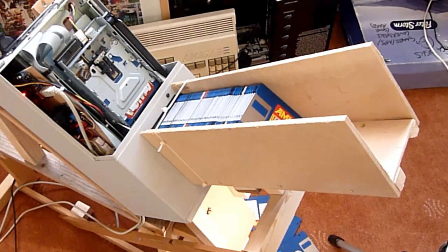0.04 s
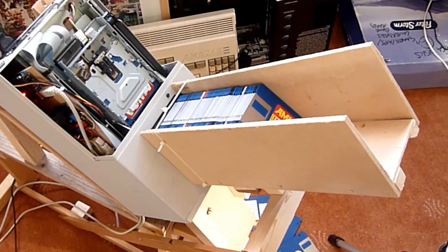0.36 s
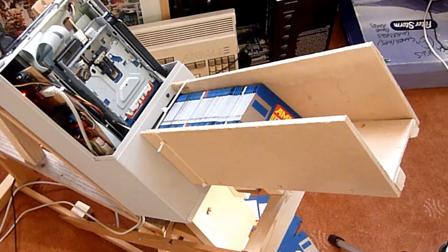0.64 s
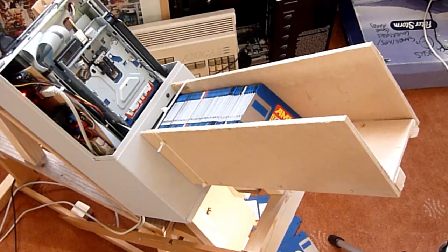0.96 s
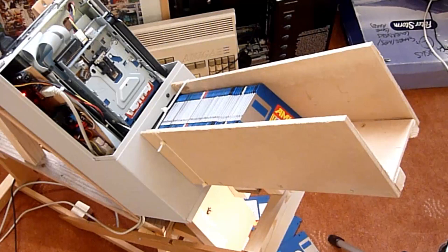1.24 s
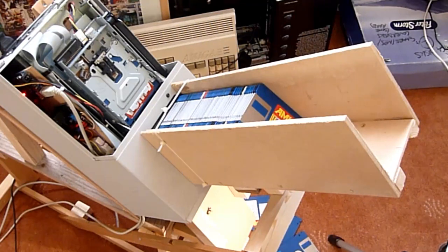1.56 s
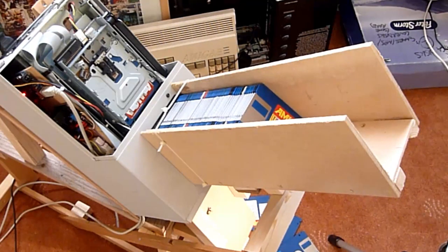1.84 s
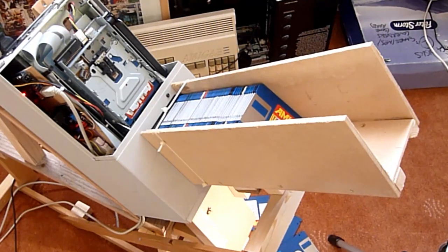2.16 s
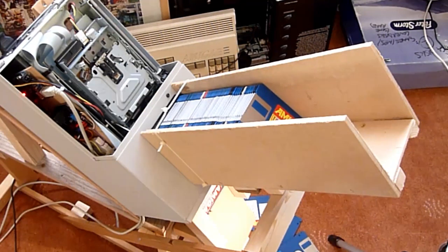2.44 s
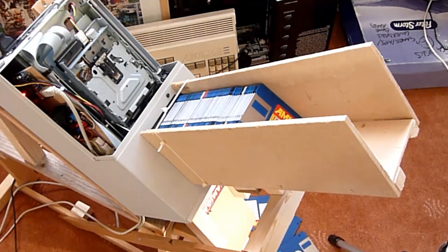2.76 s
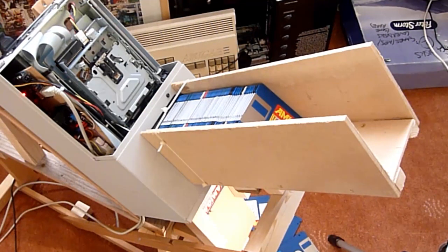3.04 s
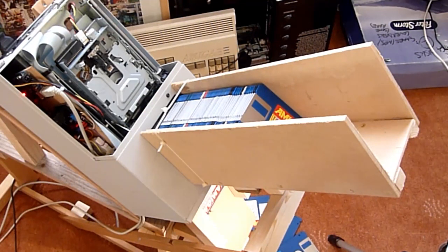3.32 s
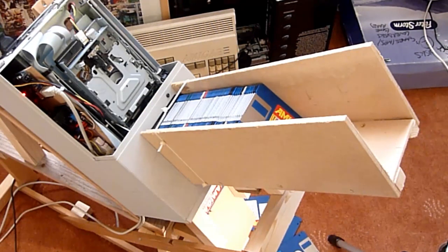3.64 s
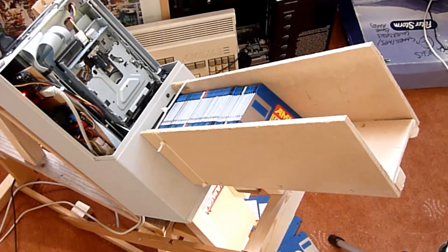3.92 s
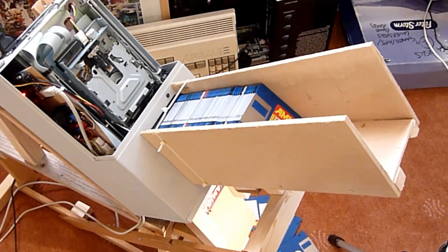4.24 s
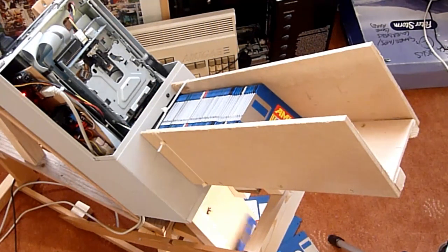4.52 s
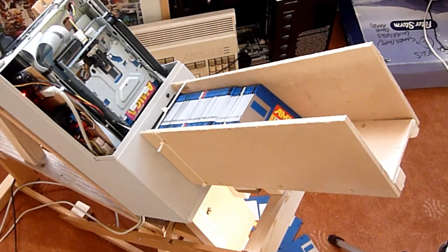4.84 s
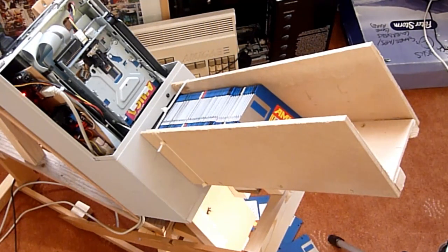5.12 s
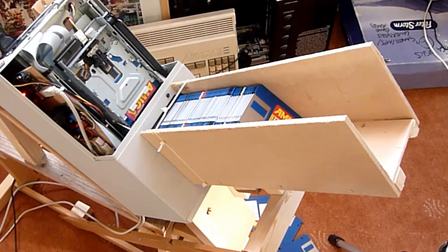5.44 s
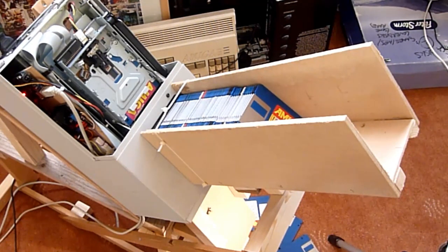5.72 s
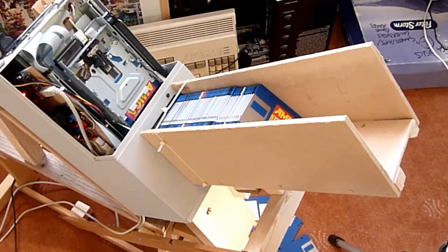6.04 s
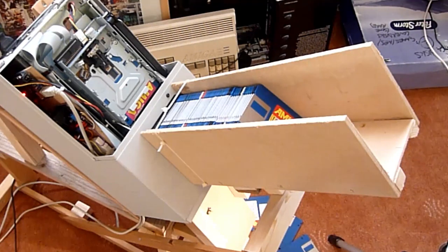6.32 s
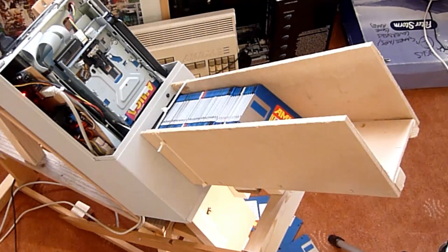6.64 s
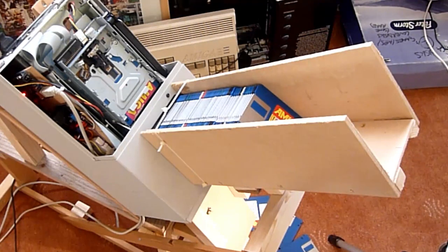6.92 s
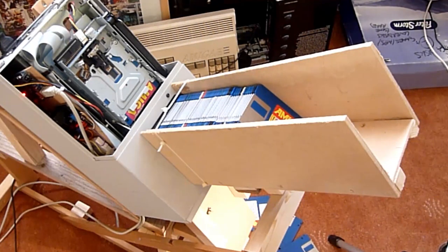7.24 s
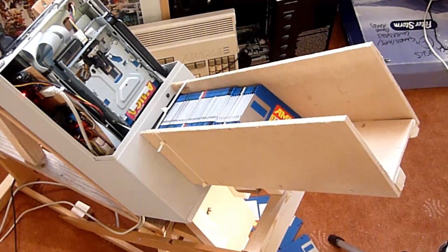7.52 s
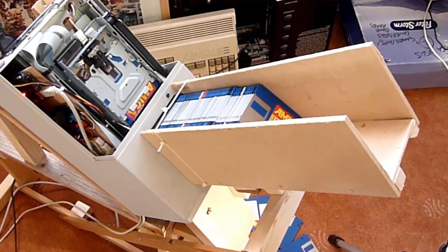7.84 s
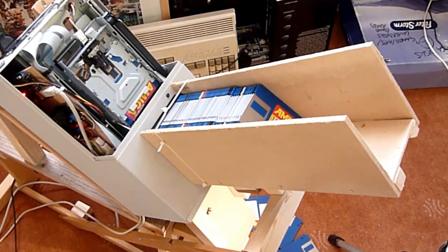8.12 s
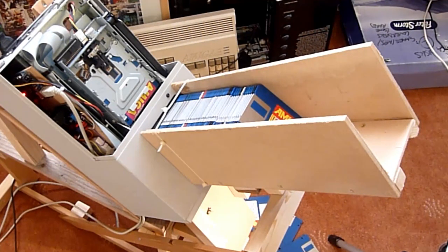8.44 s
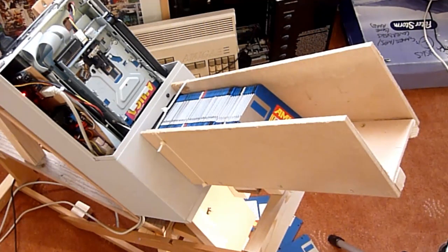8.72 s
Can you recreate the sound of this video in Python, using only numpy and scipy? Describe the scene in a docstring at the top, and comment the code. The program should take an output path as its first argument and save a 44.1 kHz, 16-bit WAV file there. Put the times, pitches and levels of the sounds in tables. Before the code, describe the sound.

Steady motor whine and ticking from a floppy disk loader, interrupted by sharp clacks as one disk ejects and another loads.

```python
"""A home-made floppy disk autoloader, heard from close above in a small, dry room.
A geared motor whirrs and a small fan hums throughout. At first the drive holds a disk and ticks.
At 2.3 seconds the motor sags under load and the eject mechanism clacks the disk out.
A joint squeaks faintly, and at about 4.5 seconds the next disk rattles in.
Then the motor runs free again and the ticking returns."""
import sys
import numpy as np
from scipy import signal
from scipy.fft import rfft, irfft
from scipy.io import wavfile

SR = 44100
rng = np.random.default_rng(int(sys.argv[2]) if len(sys.argv) > 2 else 0)


def wrap_up_sound(samples):
    """Save the sound to the file named by the first command line argument, as 16-bit audio."""
    columns = np.atleast_2d(samples).T
    # keep every value between -1 and 1, then stretch to whole-number steps
    tamed = np.clip(columns, -1, 1)
    steps = np.round(tamed * 32767).astype(np.int16)
    wavfile.write(sys.argv[1], SR, steps)


N = 386757

# The hum of the fan blades. Each row: pitch in Hz, level in dB.
FAN_TONES = [(480.5, -72.5), (327, -85)]
# The broad tone colour of gear and air noise. Each row: frequency in Hz, gain in dB.
WHIRR_SHAPE = [(25, -25), (80, -28), (200, -17.5), (330, -11.5), (550, -6.5), (1000, -2.5), (1500, -1),
               (1900, 3), (3000, -1.5), (4500, -5.5), (7300, -5.5), (8600, -8), (12000, -8.5), (15600, -11)]
# Resonances of the housing, the places where it rings. Each row: frequency in Hz, width in Hz, boost in dB.
HOUSING_MODES = [(1080, 28, 3.7), (1904, 109, 6.1), (2074, 140, 3.6), (2249, 122, 9.8), (2462, 140, 6.3),
                 (2667, 93, 8.9), (2822, 156, 11.2), (3210, 45, 5.9), (3350, 100, 7), (3725, 170, 8),
                 (3880, 167, 12.4), (4180, 95, 7.8), (4700, 120, 1.3), (5020, 110, 4.4), (5650, 140, 5.6),
                 (5950, 90, 4.1), (6570, 130, 2.7)]
# How alike left and right are, for the whirr and for blows.
# Each row: frequency in Hz, likeness (1 is the same, 0 is unrelated, below 0 is opposed).
WHIRR_LIKENESS = [(60, 0.16), (120, 0.13), (240, 0.13), (480, 0.35), (950, 0.44), (1890, 0.96),
                  (3770, 0.72), (7520, -0.078), (15000, -0.34)]
BLOW_LIKENESS = [(60, .3), (240, 0.94), (950, 1), (3800, 1), (15000, 0.85)]
# How far the whirr leans to the left. Each row: frequency in Hz, left minus right in dB.
WHIRR_LEAN = [(60, 0), (150, 4), (380, 4), (950, 2), (2380, 0.0), (5980, 0.0), (15000, 0.0)]
# The motor's whine. Each row: multiple of the shaft's speed, base level in dB when idle and when loaded.
WHINE_TONES = [(7, -53.5, -57.5), (14, -63.5, -74), (16, -66.5, -81), (20, -73, -78), (21, -78, -73),
               (24, -65.5, -63), (25, -78, -69), (28, -64.5, -63.5), (32, -73, -76), (36, -80, -76),
               (40, -84, -70.5), (44, -69, -66.5), (52, -88, -98), (56, -81, -88), (60, -81, -85.5),
               (62, -92, -81), (64, -80, -83)]

# The broad tone colours of the wooden frame, the plastic, the steel chassis and the hard edges,
# then of a tick's click and its tail. Each row: frequency in Hz, gain in dB.
WOOD_SHAPE = [(30, -19), (130, -13), (310, 6), (390, 5), (480, -22), (1500, -45)]
PLASTIC_SHAPE = [(60, -58), (300, -32), (600, -15.5), (820, -6), (1500, -3), (2200, 0), (2600, -11),
                 (6000, -52)]
STEEL_SHAPE = [(100, -66), (1000, -40), (2200, -7.5), (2600, -2.5), (4800, 0.5), (5500, -5.5), (8000, -29)]
EDGE_SHAPE = [(100, -75), (2500, -36), (5300, -3.5), (7500, -0.5), (10000, 0), (14000, -0.5), (15400, 2)]
TICK_CLICK_SHAPE = [(100, -70), (3000, -31), (5500, 5.5), (8500, -6), (11000, 4), (13500, -7), (15200, 2.5)]
TICK_TAIL_SHAPE = [(100, -70), (3000, -23), (3650, -8), (4050, -8), (4550, -1), (5200, -10), (8000, -28)]
# Resonances of the plastic, the steel and the edges. Each row: frequency in Hz, width in Hz, boost in dB.
PLASTIC_MODES = [(850, 150, 2.6), (1430, 160, 3), (1705, 140, 5.7), (2020, 190, 3)]
STEEL_MODES = [(2685, 210, 7.4), (3520, 170, 4), (3740, 320, 5.7), (4260, 130, 4), (4580, 230, 6.6)]
EDGE_MODES = [(5820, 120, 5), (6840, 160, 6), (7320, 150, 5.1), (7840, 160, 4), (8350, 200, 7.6),
              (9400, 120, 6.1), (11350, 200, 4), (13600, 600, 3)]

# The two chassis pings in a tick. Each row: pitch in Hz, relative level in dB, time to swell in seconds.
PING_TONES = [(3695, -1.5, 0.0025), (4580, -6.5, 0.0021)]
# Runs of evenly spaced ticks. Each row: first and last tick in seconds, base levels of ping and click
# in dB, delay of the upper ping in seconds.
HEAD_TICK_RUNS = [(0.0994, 0.0994, -41.5, -45, 0.0053), (0.371, 2.0315, -43.3, -44.3, .003),
                  (4.9492, 4.9492, -39, -48, 0), (4.9552, 4.9552, -36.5, -45, 0),
                  (5.4307, 5.4307, -37.5, -47, 0), (5.7018, 7.6514, -36.7, -47.3, 0),
                  (7.961, 8.5172, -36.5, -47.3, 0)]
# The squeak of a dry joint. Each row: pitch in Hz, level in dB.
SQUEAK_TONES = [(5700, -56.5), (11400, -64), (12790, -68)]
# Slider and disk rub their guides. Each row: start and length in seconds, treble and steel levels in dB.
GUIDE_SCRAPES = [(2.321, 0.046, -38.5, -47), (2.391, .013, -29.5, -38), (3.287, 0.085, -57, -60),
                 (4.551, 0.058, -37, -42), (4.606, 0.072, -37, -44.5)]
# Dry snaps of hard edges and the latch. Each row: start in seconds, level in dB.
EDGE_SNAPS = [(2.357, -24), (4.574, -12), (4.5895, -14), (4.6427, -18), (4.81, -21), (5.008, -27)]
# The ring of the lever's end stop. Each row: pitch in Hz, level in dB, seconds to fade by 60 dB.
END_STOP_TONES = [(884, -37, 0.04), (2033, -21.5, 0.03), (4690, -15, 0.019)]
# The parts that strike the drive. Each name gives: the plastic and the steel resonance it favours in Hz,
# boost of the highest treble in dB, seconds for the steel to fade by 60 dB.
STRIKING_PARTS = {"latch": (1650, 3740, -10, 0.07), "lever": (1502, 4650, -1, 0.03),
                  "carriage": (2070, 4700, 3, 0.046), "disk": (850, 3840, 4, 0.047)}
# The blows on the drive. Each row: start in seconds, striking part, strength in dB,
# then plastic knock, edge crack and bounce, each in dB above that strength.
DRIVE_BLOWS = [(2.3, "latch", -22, -20, -3.5, -7.5), (2.315, "latch", -33.5, -9, 0, -10),
               (2.355, "lever", -23, -5.5, 2, -2), (2.389, "lever", -28.5, -13, 4, -4),
               (2.4048, "lever", -18.5, -6, 1.5, -15), (4.538, "disk", -35, -5, 4.5, -1),
               (4.549, "disk", -36, -9, 5, -17), (4.5602, "carriage", -26.5, -6, -1, -1.5),
               (4.5738, "carriage", -25, -6, 3, -7), (4.5895, "disk", -34, -6, 7, 2.5),
               (4.623, "disk", -35, -9, 2, -15), (4.6326, "disk", -25.5, -11.5, -0.5, -3),
               (4.654, "disk", -33, -7.5, 0.5, -4)]
# Heavy blows shake the wooden frame. Each row: start in seconds, strength in dB.
FRAME_THUDS = [(2.3015, -54), (2.3544, -48.5), (2.4064, -61), (4.565, -45.5), (4.594, -56), (4.6325, -56),
               (4.656, -61)]


def amp(db):
    """Turn decibels into a factor to multiply by."""
    return 10 ** (np.asarray(db) / 20)


def unit_level(x):
    """Scale a signal so that its average (rms) level is 1."""
    return x / np.sqrt(np.mean(x ** 2) + 1e-20)


def curve_at(points, hz):
    """Read a smooth curve from a table, between its frequencies."""
    table_hz, values = np.transpose(points)
    return np.interp(np.log(hz + 1), np.log(table_hz + 1), values)


def add(mix, start_s, sound):
    """Mix a sound in at its start time."""
    part = mix[:, round(start_s * SR):][:, :sound.shape[1]]
    part += sound[:, :part.shape[1]]


def colour_db(shape, modes, hz):
    """The gain in dB of a broad tone colour with resonance peaks on top."""
    peaks = sum(db * .5 ** ((2 * (hz - centre) / width) ** 2) for centre, width, db in modes)
    return curve_at(shape, hz) + peaks


def wander(rate_hz):
    """A smooth random wobble of average size 1, up to about the given rate."""
    hz = np.fft.rfftfreq(N, 1 / SR)
    return unit_level(irfft(rfft(rng.standard_normal(N)) * np.exp(-(hz / rate_hz) ** 2), N))


def stereo(spectra, likeness):
    """Blend two unrelated spectra into a left and a right that are partly alike."""
    same = np.clip(likeness, -1, 1)
    mid = spectra[0] * np.sqrt((1 + same) / 2)
    side = spectra[1] * np.sqrt((1 - same) / 2)
    return np.array([mid + side, mid - side])


def blow(db, fade_s, shape, modes=(), rise_s=0.00055, size=8192):
    """A burst of tiny contacts rings a part; it starts near db and drops 60 dB in fade_s."""
    t, hz = np.arange(size) / SR, np.fft.rfftfreq(size, 1 / SR)
    fade = amp(-60 * t / fade_s) * (1 - np.exp(-t / rise_s))
    burst = rng.standard_normal((2, size)) * fade
    for _ in range(2):  # hard contacts drive all frequencies alike
        burst = irfft(np.exp(1j * np.angle(rfft(burst)))) * np.sqrt(fade)
    log_gain = np.log(amp(colour_db(shape, modes, abs(np.fft.fftfreq(size, 1 / SR)))))
    ringing = np.exp(np.conj(signal.hilbert(log_gain)))[:len(hz)]  # rings only after it is struck
    sound = irfft(stereo(rfft(burst), curve_at(BLOW_LIKENESS, hz)) * ringing)
    return amp(db) * unit_level(sound) * np.sqrt(np.mean(fade ** 2))


def room(sound, fade_s=0.085, size=12000):
    """The carpeted room answers with a very short echo."""
    t = np.arange(size) / SR
    tail = rng.standard_normal((2, size)) * amp(-60 * t / fade_s) * (1 - np.exp(-t / 0.0043))
    return signal.fftconvolve(sound, tail / np.linalg.norm(tail[0]), axes=1)[:, :N]


def low_hum(hz=196, db=-90, end_s=2.33):
    """A faint low drone while the first disk is in the drive."""
    t = np.arange(N) / SR
    fade_out = np.clip((end_s - t) / .05, 0, 1)
    return np.sqrt(2) * amp(db) * np.sin(2 * np.pi * hz * t) * fade_out


def fan(pitch_waver=0.00211, flicker_db=1.2, lean_db=1.2):
    """The blades of the cooling fan hum, wavering a little and louder on the left."""
    wavering_t = np.cumsum(1 + pitch_waver * wander(7.4)) / SR
    hum = sum(np.sqrt(2) * amp(db) * np.sin(2 * np.pi * hz * wavering_t) for hz, db in FAN_TONES)
    return hum * amp(flicker_db * wander(11)) * amp([[lean_db], [-lean_db]])


def motor_effort(start_s=2.27, grip_s=0.0898, push_s=0.299, end_s=4.7, relax_s=.17,
                 slack_at_s=3.37, slack_s=.09):
    """The motor's load over time (0 idle, 1 working), and the dB this adds to its upper whine."""
    t = np.arange(N) / SR
    # It waits, grips, works, pushes the next disk home, then runs free.
    load = np.interp(t, [start_s, start_s + grip_s, end_s - push_s, end_s], [.12, 1, 1, 1.15])
    load *= np.exp(-np.maximum(t - end_s, 0) / relax_s)
    slack = np.exp(-((t - slack_at_s) / slack_s) ** 2)  # midway the mechanism goes slack for a moment
    upper_db = 1.2 * load - 9 * slack
    return load - 0.2205 * slack, upper_db


def motor_whirr(idle_db=-44.82, load_db=-0.23, flicker_db=0.33, right_lag_s=.000012):
    """Noise from gears, brushes and air rings through the housing."""
    hz = np.fft.rfftfreq(N, 1 / SR)
    noise = stereo(rfft(rng.standard_normal((2, N))), curve_at(WHIRR_LIKENESS, hz))
    lean_db = np.array([[.5], [-.5]]) * curve_at(WHIRR_LEAN, hz)
    noise *= amp(colour_db(WHIRR_SHAPE, HOUSING_MODES, hz) + lean_db)
    noise[1] *= np.exp(-2j * np.pi * hz * right_lag_s)  # the motor sits a little to the left
    load, _ = motor_effort()
    level_db = idle_db + load_db * load + flicker_db * wander(70)
    return amp(level_db) * unit_level(irfft(noise, N))


def motor_whine(idle_hz=238.6, sag_hz=3.2, flutter_hz=0.087, shimmer_db=0.5, spread=0.62):
    """Tones at multiples of the shaft's speed; load slows the shaft and changes which are loudest."""
    load, upper_db = motor_effort()
    turns = np.cumsum(idle_hz - sag_hz * load + flutter_hz * wander(25.4)) / SR
    shimmer, out = wander(27), np.zeros((2, N))
    for multiple, idle_db, loaded_db in WHINE_TONES:
        db = idle_db + (loaded_db - idle_db) * load + upper_db * (multiple > 20)
        level = amp(db + shimmer_db * np.roll(shimmer, rng.integers(N)))
        lag = np.array([[0], [spread * multiple / 20]])  # radians by which the right side trails
        out += np.sqrt(2) * level * np.sin(2 * np.pi * (multiple * turns + rng.random()) - lag)
    return out


def tick_times(every_s=.278, scatter_db=.5):
    """List every tick of every run, each a little louder or softer by chance."""
    for first_s, last_s, ping_db, click_db, delay_s in HEAD_TICK_RUNS:
        count = 1 + round((last_s - first_s) / every_s)
        for start_s in np.linspace(first_s, last_s, count):
            chance_db = scatter_db * rng.standard_normal()
            yield start_s, ping_db + chance_db, click_db + chance_db, delay_s


def head_ticks(click_boost_db=1.0, tail_db=-12, tail_fade_s=0.1, pitch_scatter=0.0075):
    """The drive's head steps a few times a second: a click, then two chassis pings swell and die."""
    t, out = np.arange(1200) / SR, np.zeros((2, N))
    for start_s, ping_db, click_db, delay_s in tick_times():
        add(out, start_s, blow(click_db + click_boost_db, 0.035, TICK_CLICK_SHAPE, rise_s=.0001))
        add(out, start_s + .002, blow(ping_db + tail_db, tail_fade_s, TICK_TAIL_SHAPE))
        for k, (hz, db, swell_s) in enumerate(PING_TONES):
            swell = (t / swell_s * np.exp(1 - t / swell_s)) ** 4
            pitch_hz = hz * (1 + pitch_scatter * rng.standard_normal())
            ping = swell * np.sin(2 * np.pi * (pitch_hz * t + rng.random()))
            add(out, start_s + k * delay_s, np.sqrt(2) * amp(ping_db + db) * ping[None])
    return out


def squeak(start_s=3.29, length_s=0.081):
    """A few high tones swell and fade as a dry joint slips."""
    t, out = np.arange(int(length_s * SR)) / SR, np.zeros((2, N))
    tone = sum(np.sqrt(2) * amp(db) * np.sin(2 * np.pi * hz * t) for hz, db in SQUEAK_TONES)
    add(out, start_s, tone[None] * signal.windows.tukey(len(t), .6))
    return out


def scrapes():
    """Sliding parts rub the chassis in a stream of tiny contacts."""
    out = np.zeros((2, N))
    for start_s, length_s, treble_db, steel_db in GUIDE_SCRAPES:
        rub = blow(treble_db, 2, EDGE_SHAPE, EDGE_MODES) + blow(steel_db, 1.8, STEEL_SHAPE, STEEL_MODES)
        size = int(length_s * SR)
        add(out, start_s, rub[:, :size] * signal.windows.tukey(size, .25))
    return out


def snaps(sizzle_db=-18):
    """Hard edges click for about a millisecond, and the sheet steel sizzles briefly after."""
    out = np.zeros((2, N))
    for start_s, db in EDGE_SNAPS:
        click = blow(db, 0.0025, EDGE_SHAPE, rise_s=.00005)
        sizzle = blow(db + sizzle_db, 0.042, EDGE_SHAPE, EDGE_MODES)
        add(out, start_s, click + sizzle)
    return out


def end_stop(start_s=2.4066, rise_s=0.00032):
    """The eject lever slams into its end stop and rings the chassis."""
    t, out = np.arange(4000) / SR, np.zeros((2, N))
    ring = sum(amp(db - 60 * t / fade_s) * np.sin(2 * np.pi * (hz * t + rng.random()))
               for hz, db, fade_s in END_STOP_TONES)
    ring *= 1 - np.exp(-t / rise_s)
    add(out, start_s, np.sqrt(2) * ring[None])
    return out


def strike(part, db, knock_db, crack_db, favour_db=7):
    """One hit: plastic knocks, steel rings, an edge cracks; the striking part picks what rings most."""
    plastic_hz, steel_hz, top_db, fade_s = STRIKING_PARTS[part]
    plastic_modes = PLASTIC_MODES + [(plastic_hz, 260, favour_db)]
    steel_modes = STEEL_MODES + [(steel_hz, 320, favour_db)]
    edge_modes = EDGE_MODES + [(13800, 6200, top_db)]
    knock = blow(db + knock_db, fade_s * 1.34, PLASTIC_SHAPE, plastic_modes)
    ring = blow(db, fade_s, STEEL_SHAPE, steel_modes)
    crack = blow(db + crack_db, fade_s * 1.66, EDGE_SHAPE, edge_modes, rise_s=0.00018)
    return knock + ring + crack


def clacks(gain_db=0.47, bounce_s=.007, bounce_knock_db=-7):
    """Moving parts and disk strike the drive and bounce once; heavy blows thump the wooden frame."""
    out = np.zeros((2, N))
    for start_s, part, db, knock_db, crack_db, bounce_db in DRIVE_BLOWS:
        add(out, start_s, strike(part, db, knock_db, crack_db))
        add(out, start_s + bounce_s, strike(part, db + bounce_db, knock_db + bounce_knock_db, crack_db))
    for start_s, db in FRAME_THUDS:
        add(out, start_s, blow(db, 0.064, WOOD_SHAPE, rise_s=0.0011))
    return amp(gain_db) * out


def scene(echo_db=-23.0):
    """Mix the drive's short sounds and their faint echo with the motor, the fan and the drone."""
    drive = clacks() + end_stop() + scrapes() + snaps() + head_ticks() + squeak()
    return drive + amp(echo_db) * room(drive) + motor_whine() + motor_whirr() + fan() + low_hum()


def record(dry):
    """Cut away the very highest treble."""
    cutoff_hz = 15850
    low_pass = signal.firwin(511, cutoff_hz, window=("kaiser", 9), fs=SR)
    return signal.oaconvolve(dry, low_pass[None], "same")


dry = scene()
out = record(dry)
wrap_up_sound(out)
```